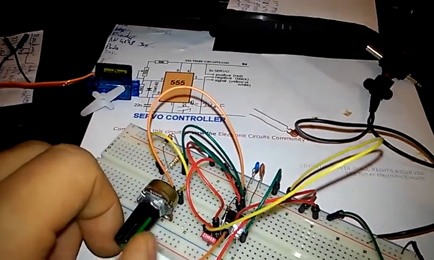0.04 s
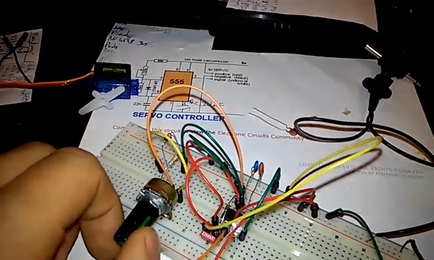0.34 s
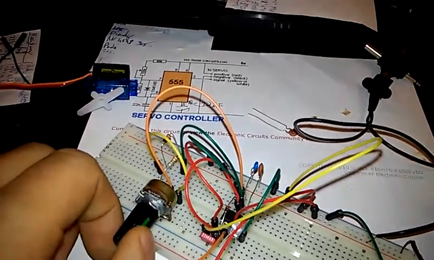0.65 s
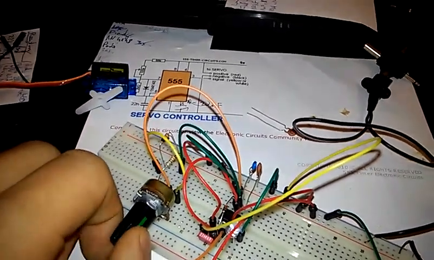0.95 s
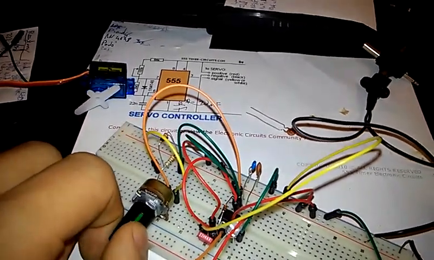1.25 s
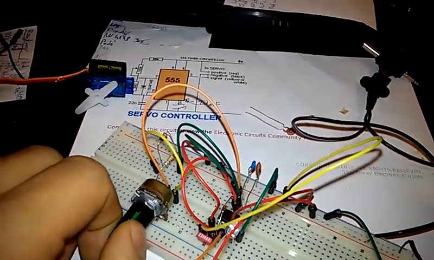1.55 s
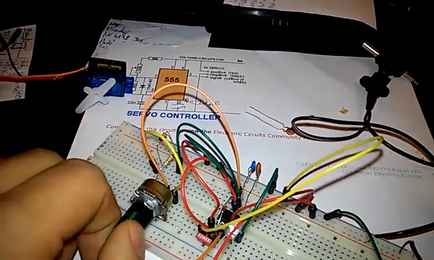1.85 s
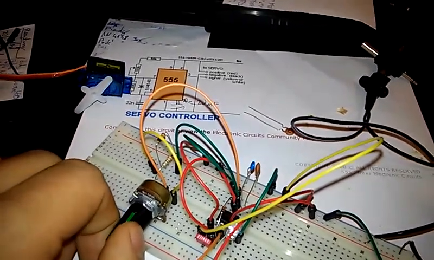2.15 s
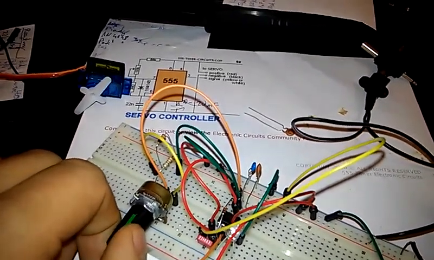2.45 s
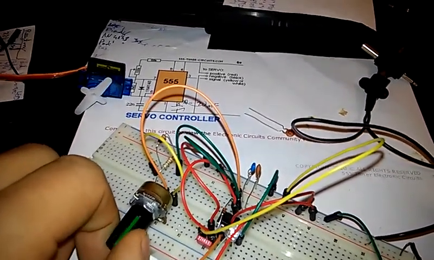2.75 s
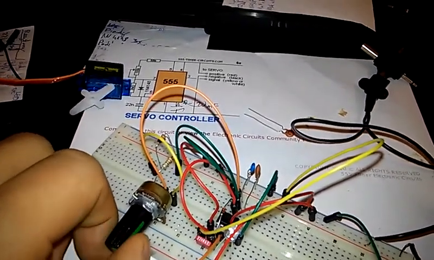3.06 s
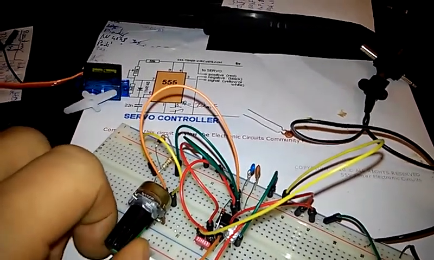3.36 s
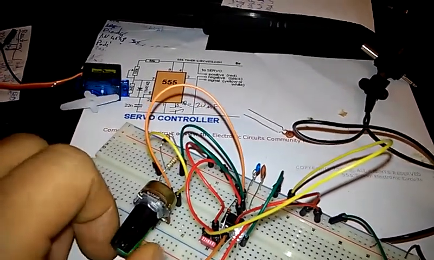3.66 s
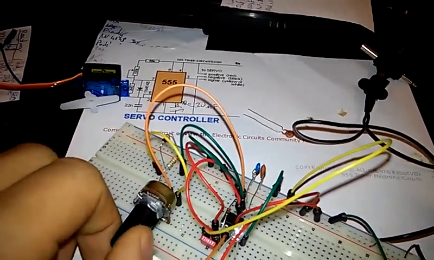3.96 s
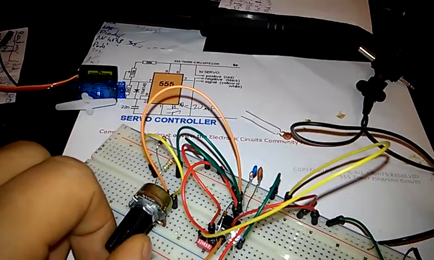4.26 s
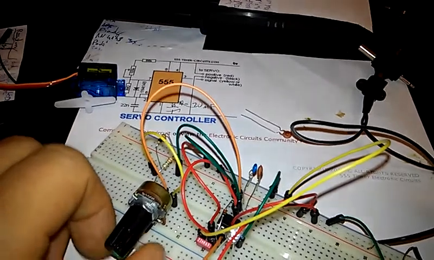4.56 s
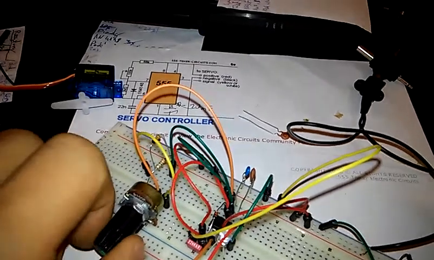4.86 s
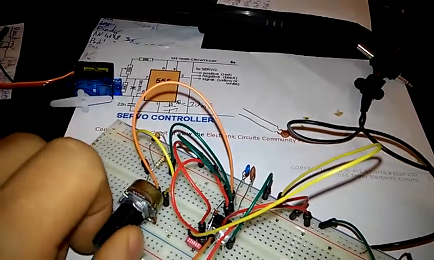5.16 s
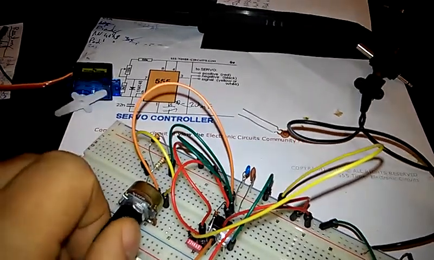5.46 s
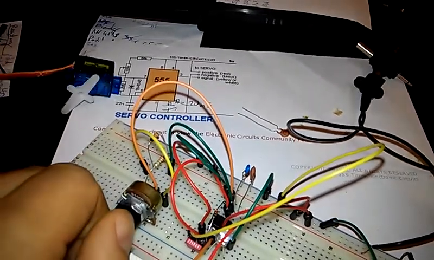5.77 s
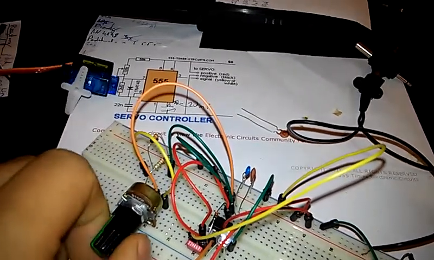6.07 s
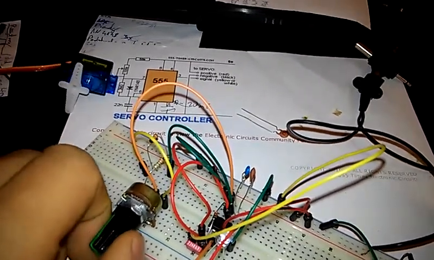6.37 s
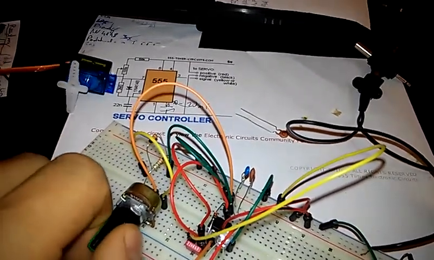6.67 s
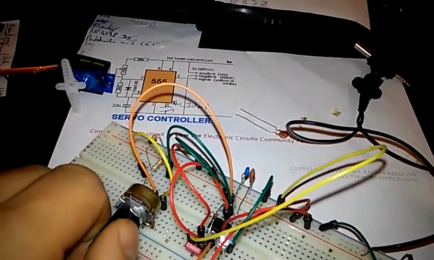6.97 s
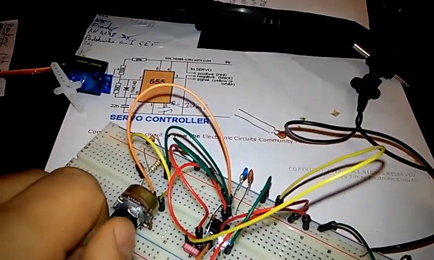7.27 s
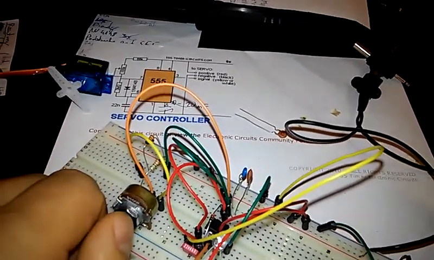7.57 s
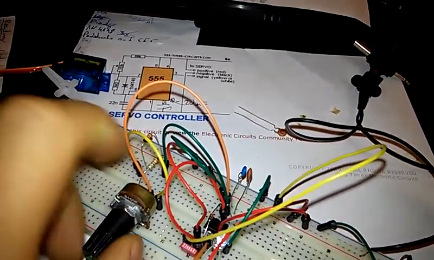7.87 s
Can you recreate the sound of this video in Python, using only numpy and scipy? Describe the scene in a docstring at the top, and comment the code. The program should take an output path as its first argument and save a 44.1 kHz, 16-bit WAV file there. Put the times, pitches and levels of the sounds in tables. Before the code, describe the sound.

A small plastic-geared servo motor gives a few faint, scratchy ticks as a hand turns a knob. It then whirs in a jerky run of about a second, pauses, and returns with two louder stuttering sweeps that trail off into ticks. The rattle is thin and bright. Soft bumps on the workbench and a faint wavering hum lie underneath, heard close by in a small, quiet room.

```python
"""Gear rattle of a small servo

A plastic-geared servo on a workbench follows a hand-turned knob. Its control pulse comes about 19
times a second, so each turn becomes a row of jerks. Each jerk is a train of tooth impacts that excites
the resonances of the case; greater motor effort makes it louder and brighter. The bench rumbles and
thumps faintly, a low hum wavers over a faint hiss, and a small room reflects the rattle."""
import sys
import numpy as np
from scipy import signal
from scipy.fft import rfft, irfft, next_fast_len
from scipy.io import wavfile

SR = 44100
rng = np.random.default_rng(int(sys.argv[2]) if len(sys.argv) > 2 else 0)


def put_to_file(sound):
    """Save the sound as 16-bit audio at rate SR, in the file named by the first command-line argument."""
    columns = np.atleast_2d(sound).T  # one column per channel
    safe = np.clip(columns, -1, 1)
    whole_steps = np.round(safe * 32767)
    wavfile.write(sys.argv[1], SR, whole_steps.astype(np.int16))


N = 354123
TIME = np.arange(N) / SR
PULSE_HZ = 18.9

# Motor drive, one curve for each turn of the knob (time [s], effort [dB], nominal push length [s])
FIRST_TOUCH = [(0.04, -50, 0.01), (0.09, -72, 0.0065), (0.15, -55.2, 0.0078), (0.2, -63, 0.0053),
               (0.26, -84, 0.0045), (0.31, -71.5, 0.0052)]
CREEP = [(1.22, -71.9, 0.0066), (1.27, -61.4, 0.0048), (1.32, -57.5, 0.014), (1.43, -60, 0.0059),
         (1.529, -47.5, 0.0079), (1.691, -55, 0.0068), (1.752, -45.5, 0.0049), (1.851, -61, 0.0046),
         (2.062, -58, 0.006), (2.11, -72, 0.0057), (2.27, -83, 0.002), (2.38, -69.5, 0.0035)]
SLOW_SWEEP = [(2.81, -66, 0.0019), (2.97, -47.5, 0.011), (3.02, -37, 0.022), (3.13, -33, 0.0091),
              (3.18, -38, 0.011), (3.4, -30.5, 0.014), (3.5, -27, 0.015), (3.56, -30.5, 0.008),
              (3.61, -38.5, 0.014), (3.72, -39, 0.007), (3.99, -78.5, 0.0052)]
NUDGE = [(4.15, -65.5, 0.0073), (4.201, -57, 0.0062), (4.251, -91, 0.0037), (4.31, -70, 0.0056)]
FAST_SWEEP = [(5.199, -69.5, 0.0053), (5.258, -51.5, 0.0047), (5.315, -42.5, 0.018), (5.372, -33, 0.013),
              (5.418, -25, 0.02), (5.476, -21.5, .016), (5.575, -22, 0.014), (5.623, -23.5, 0.015),
              (5.681, -23, 0.019), (5.78, -18, 0.016), (5.831, -18, .015), (5.887, -24, .015),
              (5.936, -26.5, .013), (5.987, -27.5, 0.017), (6.036, -21, 0.011), (6.086, -28.5, 0.018),
              (6.141, -26, 0.0074), (6.239, -35.5, 0.0073), (6.293, -43.5, 0.0037), (6.347, -43.5, 0.0047),
              (6.4, -63, 0.0064), (6.45, -64.5, 0.0029)]
LAST_SWEEP = [(6.5, -54.5, 0.0056), (6.61, -61, 0.0033), (6.666, -51, 0.0075), (6.824, -46, 0.0057),
              (6.929, -39, 0.022), (6.986, -27.5, .011), (7.034, -29.5, 0.018), (7.089, -26.5, 0.017),
              (7.142, -27, .018), (7.191, -28.5, .006), (7.24, -34.5, 0.013), (7.295, -34.5, 0.012),
              (7.352, -33, 0.0077), (7.399, -34.5, 0.008), (7.501, -39, .015), (7.548, -33, 0.012),
              (7.608, -36.5, 0.013), (7.662, -41.5, 0.0072), (7.758, -49, 0.0083), (7.869, -49.5, 0.0055),
              (7.92, -65.5, 0.0068), (7.975, -57.5, 0.0059)]
TURNS = [FIRST_TOUCH, CREEP, SLOW_SWEEP, NUDGE, FAST_SWEEP, LAST_SWEEP]
# Lag of the control pulses behind a steady beat (beat time [s], lag [s])
PULSE_LAG = [(0, .042), (1.35, .055), (2.35, .05), (3.05, .063), (3.3, .064), (3.5, .068), (3.85, .067),
             (4.1, .076), (5.15, .073), (5.3, .078), (5.6, .069), (5.85, .062), (6.05, .051), (6.45, .047),
             (6.8, .053), (7.05, .045), (7.5, .039), (7.95, .035)]
# Tone of the gears as the horn goes round
# (time [s], knock below 3 kHz [dB], clack near 4 kHz [dB], brightness above 10 kHz [dB])
MESH_TONE = [(.04, -2, 10.5, 3.5), (1.53, -3, 3, -2), (2.0, -0.5, 7, 1), (3.0, -3, 5.5, -2),
             (3.3, -6.5, 8, 0), (3.56, -12, 5, -1.5), (3.668, 3.5, 7.5, 2.5), (3.85, -27, 8.5, 6),
             (5.3, -4.5, 4, 0.5), (5.58, -12.5, -2, -2.5), (5.63, 1.5, 4.5, 3), (5.83, 2, -2, -4),
             (5.94, 4, 7, -1.5), (6.14, 3, 0, -1), (6.24, 1, 2, 3.5), (6.72, -9, 4, -3.5),
             (7.03, -3, 3.5, 1), (7.19, -5.5, 5, 2), (7.45, -4.5, 4.5, 4), (7.66, -6, -1, 0),
             (7.87, -8, 0, 0.5)]
# Broad response of the plastic case (frequency [Hz], level [dB])
CASE_RESPONSE = [(300, -51), (850, -49), (1100, -36), (2300, -27), (3000, -28), (4900, -19.5), (6000, -4.5),
                 (7500, -2), (8400, -14.5), (10200, -10.5), (11500, -19.5), (13500, -23.5), (15600, -40)]
# Narrow resonances and notches of case and horn (frequency [Hz], width [Hz], gain [dB])
CASE_RESONANCES = [(1100, 180, 6.5), (1510, 80, 9), (2210, 69, 3), (2685, 84, 6), (2930, 230, 9),
                   (3500, 150, 6), (4256, 70, 6.5), (5450, 64, 0), (5970, 50, -7.5), (6040, 70, -5.5),
                   (5930, 96, 9), (6100, 40, 2.5), (6410, 210, 4.5), (6726, 61, 8), (7614, 27, -11.5),
                   (7000, 310, 2.5), (7484, 260, 6.5), (7720, 40, 0), (8870, 360, 5.5), (9260, 170, -2),
                   (10090, 70, 1), (11300, 150, 6)]
# Ring set off by the jerks of the fast sweep (time [s], frequency [Hz], level [dB])
SWEEP_RING = [(5.40, 1403, -44.5), (5.55, 1370, -50.5), (5.75, 1560, -65), (5.83, 1590, -57),
              (5.93, 1134, -36), (6.04, 1122, -32.5), (6.1, 1110, -58)]
# Sizzle of the rolling gears (frequency [Hz], relative density [dB])
SIZZLE_SPECTRUM = [(2000, -42.5), (5000, -8), (8500, 1.5), (10500, -1), (13000, -10), (16000, -11)]
# Stirring of the hand on the bench (time [s], rumble level [dB], rubbing level [dB])
HAND_MOTION = [(.04, -72, -69.5), (.12, -81, -81), (.9, -78.5, -77.5), (1.5, -80, -81), (1.8, -78.5, -78),
               (2.2, -83.5, -82), (2.8, -82, -77), (3.12, -68.5, -67.5), (3.55, -57.5, -61),
               (3.8, -70, -68), (4.15, -84.5, -82.5), (5.0, -78.5, -77.5), (5.28, -79, -78),
               (5.6, -62, -56.5), (5.95, -57.5, -56.5), (6.28, -65.5, -63.5), (6.64, -79.5, -78),
               (6.86, -79, -79), (7.09, -64, -62.5), (7.55, -64.5, -64.5), (8.03, -77, -76.5)]
# Bench rumble and hand rubbing (frequency [Hz], relative density [dB])
RUMBLE_SPECTRUM = [(20, -17), (38, -4.5), (55, 5), (75, 2.5), (110, 2), (170, -1.5), (240, 1.5), (340, -40),
                   (700, -38)]
RUB_SPECTRUM = [(150, -23.5), (260, -8.5), (340, -3.5), (480, -6), (700, -9.5), (1000, -11.5), (1600, -13),
                (3000, -17.5), (8000, -48)]
# Knocks of hand and loose servo on the bench (time [s], level [dB], frequency [Hz], T60 [s])
BENCH_BUMPS = [(0.039, -60, 126, 0.11), (0.168, -69.5, 1850, 0.09), (2.883, -58.5, 1285, 0.024),
               (2.95, -58.5, 1060, 0.042), (3.077, -55, 456, 0.29), (3.184, -44.5, 374, 0.032),
               (3.479, -41.5, 135.8, .08), (3.478, -44, 1560, 0.015), (3.49, -48, 60.4, 0.11),
               (5.602, -50.5, 1107, 0.14), (5.892, -46.5, 384, 0.14), (7.344, -45, 128, 0.056),
               (7.352, -50, 68, 0.17)]
# Hum, swelling when the servo works (time [s], level [dB])
HUM_LEVEL = [(0.03, -78.5), (.8, -79), (1.15, -93), (1.83, -79), (2.1, -93), (2.3, -78), (2.75, -80),
             (2.97, -65), (3.28, -72), (3.43, -57), (3.68, -61.5), (3.78, -78), (4.5, -81), (5.3, -85.5),
             (5.46, -66), (5.63, -52), (6.02, -54), (6.08, -71), (6.23, -61), (6.33, -99), (6.78, -88),
             (7.25, -65.5), (7.42, -95), (7.58, -62), (7.98, -83)]
# Background hiss (frequency [Hz], relative density [dB])
HISS_SPECTRUM = [(470, -28.5), (800, -5.5), (978, -4), (1150, -16), (3650, -7), (5380, -5), (5940, -9),
                 (7450, -0.5), (8440, -6), (15000, -6.5), (16000, -19.5)]
# Reverberation time of the room (frequency [Hz], T60 [s])
ROOM_T60 = [(300, 0.18), (2000, 0.4), (7000, 0.21), (14000, 0.05)]


def servo(level_db=-0.77, usual_effort_db=-35, usual_push_s=0.019):
    """Pulsed excitation: during a turn each pulse jerks the gears; effort sets strength and brightness."""
    out = np.zeros(N)
    mesh_s, *tones = np.transpose(MESH_TONE)
    pushes = np.vstack([at_pulses(turn) for turn in TURNS])
    for (s, effort_db, length), (force, drag) in zip(pushes, rng.standard_normal((len(pushes), 2))):
        length = max(length, .003) * 1.02 * np.exp(.06 * drag)
        excess_db = effort_db - usual_effort_db
        body_db = -0.6 * np.log2(length / usual_push_s)
        knock, clack, bright = (np.interp(s, mesh_s, tone) for tone in tones)
        tone_db = (knock + body_db + .01 * excess_db, clack + body_db + .5, bright - .5 + .13 * excess_db)
        lead_s, rattle = jerk(length, effort_db + .28 * force, tone_db)
        add(out, s - lead_s, rattle)
    return gain_of(level_db) * out


def jerk(length, level_db, tone_db, slow_hz=620, fast_hz=1050, full_run_s=0.016, wheel_hz=144):
    """Impact train: tooth rate follows motor speed, which peaks higher in a longer push, up to a limit."""
    rise = .3 * length
    run = min(length / full_run_s, 1)  # share of full speed reached
    coast = .008 * max(run, .25)
    t = np.arange(-coast, length + coast, 1 / SR)
    speed = run * np.interp(t, [0, rise, length], [0, 1, 0])
    teeth_passed = np.cumsum(slow_hz + (fast_hz - slow_hz) * speed) / SR
    slip, force = rng.standard_normal((2, 64))
    hits = np.searchsorted(teeth_passed, np.arange(len(slip)) + .13 * slip)
    inside = hits < len(t)
    strikes = np.zeros(len(t))
    strikes[hits[inside]] = gain_of(-np.tanh(force[inside]))
    # each tooth chatters as it slides into and out of mesh; at speed the whole train grinds
    contact_t = np.arange(-SR // 1000, SR // 1000) / SR
    sliding = np.convolve(strikes, np.exp(-abs(contact_t) / .00023), "same")
    chatter = rng.choice([-1., 1.], SR // 10)[:len(t)]
    drive = strikes + (.34 * sliding + .08 * run ** 2) * chatter
    # the gears run slack around the push, more audibly when it is long
    slack_db = -6 * (2 - run)
    load_db = np.interp(t, [-coast, -.0005, 0, rise, length, length + coast],
                        [-40, slack_db + .5, -6, 0, -6, 1.5 * slack_db])
    # an off-centre wheel presses harder once a turn
    load_db += 2 * run * np.sin(2 * np.pi * (wheel_hz * t + rng.random()))
    rattle = signal.fftconvolve(drive * gain_of(load_db), case_click(*tone_db))
    rattle *= np.sqrt(SR / PULSE_HZ / (np.sum(rattle ** 2) + 1e-20))  # unit rms over a pulse period
    return coast + .001, gain_of(level_db) * rattle


def case_click(knock_db, clack_db, bright_db, scatter_rad=1.84, grain_hz=635, tint_db=2, size=4096):
    """Impulse response: a tooth strike sets the resonances of the case ringing; a 1 ms shift keeps the smeared
    response causal."""
    hz = abs(np.fft.fftfreq(size, 1 / SR))
    db = at_frequencies(CASE_RESPONSE, hz)
    db += sum(lift / (1 + (2 * (hz - centre) / width) ** 2) for centre, width, lift in CASE_RESONANCES)
    db += at_frequencies([(1200, 1.74 * knock_db), (2800, knock_db), (3800, clack_db), (4600, clack_db),
                          (5800, 0.0036), (7700, 0.0033), (10000, bright_db)], hz)
    minimum_phase = np.exp(np.conj(signal.hilbert(db * np.log(10) / 20)))[:size // 2 + 1]
    # each gear position has its own paths through the plastic, which smear and tint the strike
    smoothing = np.exp(-.5 * (np.fft.fftshift(hz) / grain_hz) ** 2)
    phase, tint = (unit_rms(signal.fftconvolve(row, smoothing, "same"))[:len(minimum_phase)]
                   for row in rng.standard_normal((2, size)))
    response = minimum_phase * np.exp(1j * scatter_rad * phase) * gain_of(tint_db * tint)
    return np.roll(irfft(response), SR // 1000)[:size // 2]


def pulse_times():
    """Timing drift: the control pulses lag a steady beat by a slowly varying amount."""
    beat = np.arange(0, N / SR, 1 / PULSE_HZ)
    return beat + np.interp(beat, *np.transpose(PULSE_LAG))


def at_pulses(curve):
    """Sampling: a curve yields one row at each control pulse within its span."""
    times, *columns = np.transpose(curve)
    s = pulse_times()
    s = s[(s > times[0] - .5 / PULSE_HZ) & (s < times[-1] + .5 / PULSE_HZ)]
    return np.transpose([s] + [np.interp(s, times, column) for column in columns])


def sweep_ring(attack_s=0.01, t60_s=0.051, roughness_hz=91):
    """Damped oscillation: jerks of the fast sweep leave a short ring, roughened by random modulation."""
    out, t = np.zeros(N), TIME[:SR // 4]
    for s, hz, db in at_pulses(SWEEP_RING):
        envelope = np.minimum(t / attack_s, 1) * gain_of(db - 60 * t / t60_s)
        add(out, s, envelope * np.sin(2 * np.pi * hz * t))
    return out * (1 + drift(roughness_hz))


def gear_sizzle(level_db=-27, delay_s=.025, flicker_db=2.5, flicker_hz=400):
    """Rolling noise: the gears run on faintly between jerks, in proportion to the effort."""
    effort = sum(np.interp(TIME - delay_s, s, gain_of(db), left=0, right=0)
                 for s, db, _ in map(np.transpose, TURNS))
    return gain_of(level_db + flicker_db * drift(flicker_hz)) * effort * noise(SIZZLE_SPECTRUM)


def idle_ticks(level_db=-81.5, spread_db=3.5, probability=.4, burst_s=.012):
    """Burst excitation: even at rest, some pulses nudge the motor and the case ticks faintly."""
    envelope, times = np.zeros(N), pulse_times()
    burst = np.hanning(round(burst_s * SR))
    for s, (chance, force) in zip(times, rng.random((len(times), 2))):
        if chance < probability:
            add(envelope, s - burst_s / 4, gain_of(spread_db * (2 * force - 1)) * burst)
    ticks = signal.oaconvolve(envelope * rng.standard_normal(N), case_click(0, 0, 0))[:N]
    return gain_of(level_db) * unit_rms(ticks)


def bench(rumble_db=-1.5, rub_db=-2.2, restless_db=0.5, restless_hz=7.8):
    """Friction and impact: a restless hand rumbles and rubs, and each bump rings as a damped mode."""
    out = gain_of(follow(HAND_MOTION, column=1) + rumble_db) * noise(RUMBLE_SPECTRUM)
    out += gain_of(follow(HAND_MOTION, column=2) + rub_db) * noise(RUB_SPECTRUM)
    out *= gain_of(restless_db * np.tanh(drift(restless_hz)))
    t = TIME[:SR // 4]
    for s, db, hz, t60 in BENCH_BUMPS:
        lowpass = signal.butter(2, 2 * hz, fs=SR)
        thud = unit_rms(signal.lfilter(*lowpass, rng.standard_normal(len(t))))
        add(out, s, gain_of(db - 60 * t / t60) * (np.sin(2 * np.pi * hz * t) + thud))
    return out


def hum(hz=286.4, waver_hz=7.87, flutter_db=4, trim_db=0.1):
    """Random modulation of frequency and amplitude makes a low tone waver."""
    cycles = np.cumsum(hz + waver_hz * drift(23)) / SR
    tone = np.sin(2 * np.pi * cycles) * gain_of(flutter_db * drift(30))
    return gain_of(follow(HUM_LEVEL) + trim_db) * unit_rms(tone)


def hiss(level_db=-78.5):
    """Stationary broadband noise forms a faint floor."""
    return gain_of(level_db) * noise(HISS_SPECTRUM)


def turning_room(x, swing_hz=3.1, count=3):
    """Varying multipath: as the horn swings, the sound takes one set of echo paths after another."""
    weights = (np.sqrt(2 / count) * np.cos(np.pi * (swing_hz * TIME + k / count)) for k in range(count))
    return sum(room(x * weight) for weight in weights)


def room(x, early_db=-19.5, early_t60_s=0.023, tail_db=-15.5, gap_s=0.011, echoes_per_s=4000):
    """Reverberation: early reflections off nearby surfaces, then a tail whose decay depends on frequency."""
    t = TIME[:SR * 3 // 4]
    signs = rng.choice([-1., 1.], (2, len(t)))
    near, far = signs * (rng.random(signs.shape) < echoes_per_s / SR) * (t > gap_s)
    early = near * gain_of(-60 * t / early_t60_s)
    hz, frame_s, spectra = signal.stft(far, SR, nperseg=256)
    decay = gain_of(-60 * frame_s / at_frequencies(ROOM_T60, hz)[:, None])
    tail = signal.istft(spectra * decay, SR, nperseg=256)[1][:len(t)]
    echoes = gain_of(early_db) * early / np.linalg.norm(early)
    echoes += gain_of(tail_db) * tail / np.linalg.norm(tail)
    return signal.fftconvolve(x, echoes)[:N]


def noise(spectrum):
    """Spectral shaping colours white noise; the result has unit rms."""
    size = next_fast_len(N, True)
    colour = gain_of(at_frequencies(spectrum, np.fft.rfftfreq(size, 1 / SR)))
    return unit_rms(irfft(rfft(rng.standard_normal(size)) * colour, size)[:N])


def drift(cutoff_hz):
    """Band limiting turns white noise into a random wander of unit rms."""
    size = next_fast_len(N, True)
    passband = np.fft.rfftfreq(size, 1 / SR) < cutoff_hz
    return unit_rms(irfft(rfft(rng.standard_normal(size)) * passband, size)[:N])


def gain_of(db):
    """Amplitude ratio of a level in decibels."""
    return 10 ** (np.asarray(db) / 20)


def unit_rms(x):
    """Normalisation to unit mean power."""
    return x / np.sqrt(np.mean(x ** 2) + 1e-20)


def at_frequencies(table, hz):
    """Interpolation on a logarithmic frequency axis."""
    table_hz, values = np.transpose(table)
    return np.interp(np.log(hz + 1), np.log(table_hz + 1), values)


def follow(curve, column=1):
    """Linear interpolation of one column at every sample."""
    curve = np.asarray(curve)
    return np.interp(TIME, curve[:, 0], curve[:, column])


def add(mix, start_s, sound):
    """Superposition of a sound on the mix from a given time."""
    part = mix[max(round(start_s * SR), 0):][:len(sound)]
    part += sound[:len(part)]


def scene():
    """Superposition of the servo, its reflections, the bench, the hum and the hiss."""
    gears = servo() + sweep_ring() + idle_ticks()
    return (gears + gear_sizzle() + turning_room(gears) + bench() + hum() + hiss())[None]


def record(dry, cutoff_hz=15900, dc_offset=-.0004):
    """Soft saturation rounds the highest peaks; a band limit and a small constant offset follow."""
    rounded = dry / (1 + dry ** 4) ** (1 / 4)
    lowpass = signal.firwin(511, cutoff_hz, window=("kaiser", 9), fs=SR)
    return dc_offset + signal.oaconvolve(rounded, lowpass[None], "same")


dry = scene()
out = record(dry)
put_to_file(out)
```